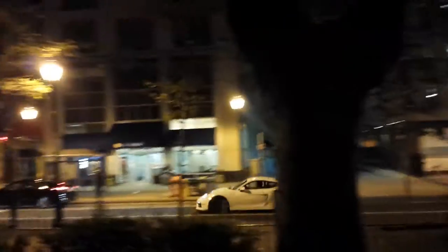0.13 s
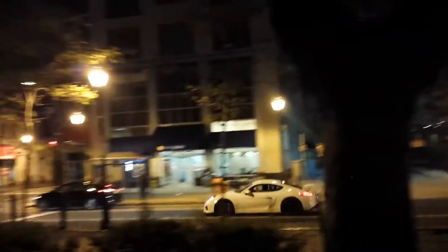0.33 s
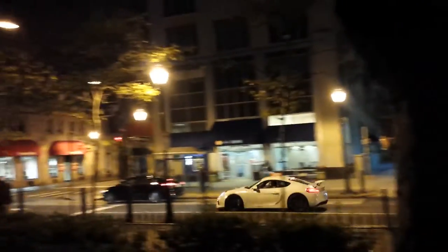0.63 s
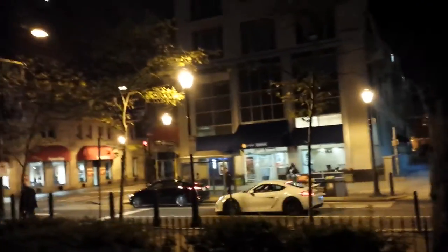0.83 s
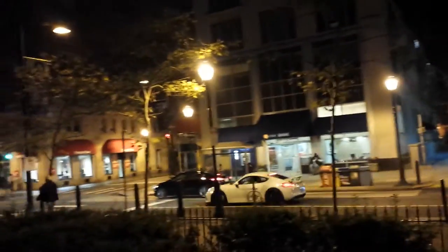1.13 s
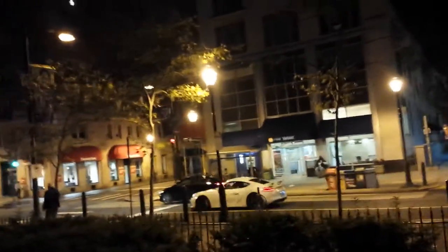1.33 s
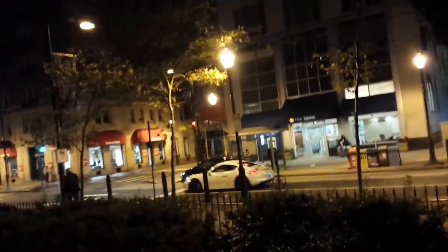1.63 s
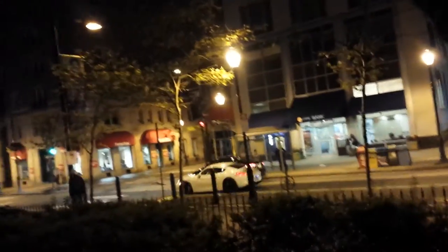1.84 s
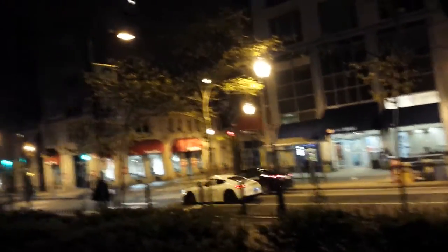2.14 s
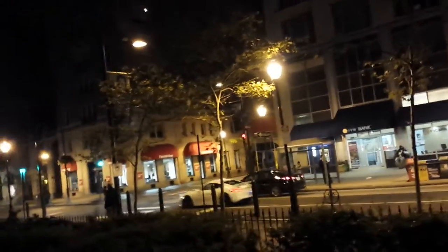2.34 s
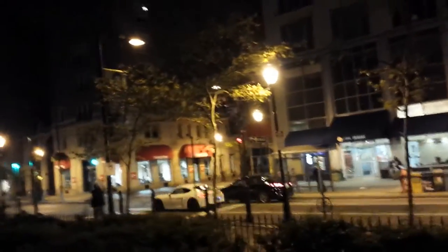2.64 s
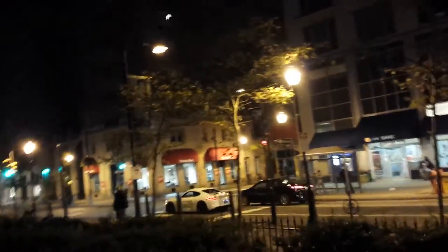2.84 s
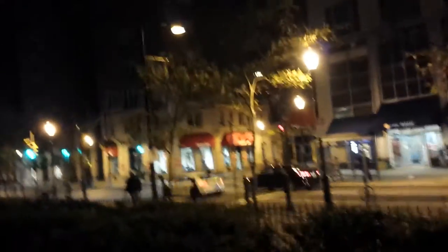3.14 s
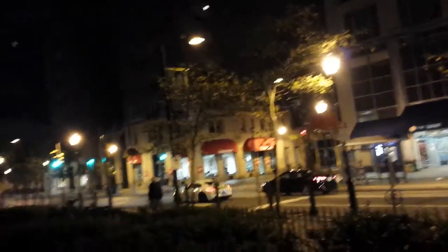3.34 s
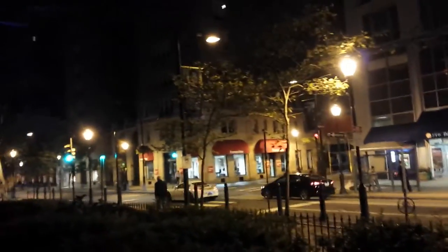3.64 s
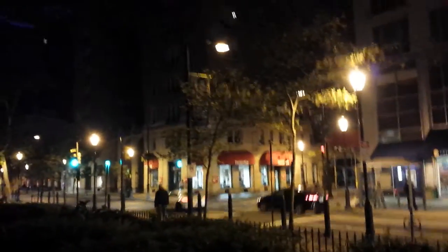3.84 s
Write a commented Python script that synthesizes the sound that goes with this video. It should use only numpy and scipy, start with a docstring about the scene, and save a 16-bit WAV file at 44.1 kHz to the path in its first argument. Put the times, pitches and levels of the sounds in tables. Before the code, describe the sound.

A car engine burbles low, revs in three short bursts, the first loudest and crackling, then climbs in pitch as it pulls away. Heard from the pavement, it echoes lightly off buildings over far traffic.

```python
"""Car pulling away on a night street

Stereo microphones on the pavement. A slow car blips its throttle three times, then accelerates steadily:
two clean exhaust orders climb over firing bursts of roar and rasp, while pulses and backfires ring the
pipe and echo off the house fronts. Tyres rush close by, far traffic rumbles and hisses, and a thin high
chirr comes and goes on the right. The sound fades in."""
import sys
import numpy as np
from scipy import signal
from scipy.fft import rfft, irfft
from scipy.io import wavfile

SR = 44100
rng = np.random.default_rng(int(sys.argv[2]) if len(sys.argv) > 2 else 0)


def bounce(signal):
    """Save signal as a 16-bit WAV file at the path given by the first command-line argument."""
    frames = np.transpose(np.atleast_2d(signal))
    limited = np.clip(frames, -1, 1)
    pcm = np.round(limited * 32767).astype(np.int16)
    wavfile.write(sys.argv[1], SR, pcm)


N = 176400
T = np.arange(N) / SR

# Engine rolling and blipping, then pulling away: t/s, exhaust beat f/Hz, order 1 and order 2 level/dB
ROLL_AND_BLIPS = [(.6, 69.25, -41, -43.5), (.72, 66.92, -37, -36.5), (1.04, 60.1, -36, -35),
                  (1.12, 61.8, -51, -44), (1.17, 77.3, -38, -53), (1.21, 77.65, -33.5, -46),
                  (1.4, 77.4, -33, -38), (1.55, 71.7, -42, -62), (1.7, 60.26, -37, -58),
                  (1.77, 53.02, -35, -34), (1.84, 63.1, -19.5, -21.5), (1.9, 69.7, -34, -27),
                  (1.96, 71.87, -28, -24.5), (2.01, 70.86, -55, -56), (2.05, 65.9, -25.5, -41),
                  (2.12, 59.8, -54, -58), (2.18, 49.98, -31, -41), (2.21, 53.5, -29, -28.5),
                  (2.3, 65.9, -25, -33), (2.36, 75.64, -29.5, -27.5), (2.41, 77.7, -23, -32.5),
                  (2.47, 74.34, -39, -45), (2.55, 55.13, -40, -34), (2.65, 63.9, -27, -32),
                  (2.72, 70.1, -33.5, -44), (2.77, 65.96, -29, -38)]
PULL_AWAY = [(2.799, 57.68, -31, -25.5), (2.88, 60.08, -35, -28.5), (3.02, 62.07, -26, -23.5),
             (3.13, 63.86, -32, -24.5), (3.246, 66.3, -22.5, -21.5), (3.32, 68.06, -24.5, -29.5),
             (3.494, 71.32, -26, -24.5), (3.557, 73.3, -23.5, -30), (3.638, 75.2, -26, -20.5),
             (3.658, 75.65, -31, -21.5), (3.8, 78.8, -28, -16.5), (4.0, 83.95, -26.5, -18.5)]
# Higher exhaust orders: order, level/dB against the louder of orders 1 and 2
HIGHER_ORDERS = [(3, -23), (4, -16), (5, -20)]
# Engine load: t/s, roar level/dB, throat level/dB, rasp level/dB
ENGINE_LOAD = [(1.5, -34, -44, -48.5), (1.75, -38.5, -45, -47), (1.8, -27.5, -40.5, -52),
               (1.815, -36, -33, -37), (1.88, -20.5, -20.5, -30), (1.905, -20, -24.5, -27.5),
               (1.93, -29, -29, -29.5), (1.97, -31.5, -32, -31), (2.02, -43, -35, -37.5),
               (2.17, -37, -43, -64), (2.25, -28.5, -37, -45), (2.35, -27, -28.5, -34),
               (2.42, -26, -33, -36), (2.47, -36, -40, -43.5), (2.6, -29, -40.5, -42),
               (2.65, -21.5, -31, -35), (2.72, -28, -37.5, -35), (2.8, -25.5, -39.5, -47),
               (2.92, -25.5, -39.5, -53), (2.96, -27.5, -34.5, -47), (3.15, -26.5, -30.5, -39),
               (3.33, -27.5, -31, -33), (3.48, -27, -28, -33.5), (3.7, -24, -27, -33),
               (3.78, -25, -30.5, -33), (4.0, -26.5, -27.5, -35)]
# Spectra of the low roar, throaty middle and hissy rasp: f/Hz, level/dB
ROAR_SPECTRUM = [(110, -2), (185, -2), (307, 1), (356, -0.5), (444, 1), (488, -7), (600, -11.5), (780, -44),
                 (1320, -120)]
THROAT_SPECTRUM = [(350, -10), (600, 4), (700, -1.5), (790, 1), (880, 0), (1070, 2.5), (1250, -2.5),
                   (1480, -4.5), (1600, -7), (1720, -11), (1920, -11.5), (3000, -31), (3900, -53),
                   (6600, -120)]
RASP_SPECTRUM = [(1470, -4), (2500, -2.5), (2970, -8), (3920, -4.5), (4320, -8), (6030, -2.5), (10100, -18),
                 (10900, -19), (11600, -48), (15100, -74), (22000, -120)]
# Exhaust pipe modes: f/Hz, level/dB, t60/s
PIPE_MODES = [(180, -4, 0.052), (305, -6.5, 0.028), (420, 2, 0.014), (782, -1.5, 0.02), (996, -17, 0.013),
              (1562, -8.5, 0.021), (3984, -11, 0.013), (5249, -6, 0.01), (5587, -7, 0.02),
              (6300, -23, 0.0087)]
# Hard firings and backfires in the blips: t/s, level/dB, tilt/(dB per octave)
BACKFIRES = [(1.809, -22, -4), (1.822, -22, -3.5), (1.836, -16.5, -2.5), (1.853, -17.5, -2.5),
             (1.867, -12, 0), (1.881, -18, 1.5), (1.894, -10, -1.5), (2.344, -24, -6), (2.37, -28, -2.5),
             (2.639, -37, 6.5)]
# Two pipe resonances under load: t/s, lower one's level/dB, upper one's level/dB
SINGING_LEVELS = [(2.9, -55, -58), (2.955, -35, -39), (2.99, -46, -52), (3.02, -39, -38), (3.1, -44, -52),
                  (3.22, -42, -50), (3.31, -42, -36), (3.4, -35, -40), (3.5, -33, -46), (3.59, -35, -47),
                  (3.66, -44, -43), (3.8, -50, -52)]
# Tyre rush close by: t/s, level/dB; its spectrum: f/Hz, level/dB
TYRE_LEVELS = [(.5, -37.5), (.7, -36), (.85, -37.5), (1.1, -43.5), (1.5, -41)]
TYRE_SPECTRUM = [(290, -34), (500, 1.5), (892, 6.5), (974, 8), (1140, 5.5), (2500, -7), (3250, -38),
                 (5500, -120)]
# Bright puffs: peak t/s, half-width/s, level/dB; their spectrum: f/Hz, level/dB
PUFFS = [(1.22, 0.12, -44), (3.362, 0.021, -23)]
PUFF_SPECTRUM = [(2240, -23), (3800, -10), (5390, -2.5), (6770, -4), (9030, -16), (9920, -18), (10700, -18),
                 (14300, -29)]
# Faint ticks: t/s, level/dB before the high-pass
TICK_HITS = [(1.601, -18), (3.89, -26)]
# Modes of a faint metal clink: f/Hz, level/dB, t60/s
CLINK_MODES = [(1500, -29, .05), (2100, -32, .045), (4600, -31, .07)]
# High chirrs: start t/s, level/dB before panning
CHIRR_ONSETS = [(0.812, -43.5), (2.41, -43.5), (3.05, -46), (3.249, -46.5), (3.69, -47), (3.95, -47)]
# Far traffic: t/s, rumble level/dB, hiss level/dB; their spectra: f/Hz, level/dB
TRAFFIC_LEVELS = [(.6, -33.5, -34.5), (.8, -34, -32.5), (1.2, -31, -32), (1.6, -33, -36),
                  (2.1, -30.5, -33.5), (3, -28, -30.5), (4, -34, -36.5)]
RUMBLE_SPECTRUM = [(15, -43), (25, -21), (53, -3.5), (91, -0.5), (119, 3.5), (157, -3), (200, -2),
                   (260, -22), (440, -120)]
TRAFFIC_HISS_SPECTRUM = [(120, -22), (200, -0.5), (258, -5.5), (300, -3), (361, -9), (427, -10), (541, -12),
                         (826, -10.5), (961, -14.5), (1390, -15.5), (2650, -22.5), (6580, -21),
                         (11300, -38), (14700, -81), (22000, -120)]
# Echoes off the house fronts: left delay/s, right delay/s, level/dB
HOUSE_ECHOES = [(.023, .031, -31), (0.055, 0.064, -12), (.094, .11, -28)]
# Likeness of the two microphones: f/Hz, likeness (0 to 1)
MIC_LIKENESS = [(60, 1), (250, 0.99), (500, 1), (1000, 0.077), (2000, 0.098), (4000, 0.11), (12000, 0.01)]
# Left microphone minus right: f/Hz, level/dB
MIC_BALANCE = [(60, 1), (110, -3), (200, -2.0), (370, -3), (670, -1), (1230, -1.5), (2260, -1.5),
               (4140, -3), (7570, -9.5), (13900, -10.5)]
# Left microphone ahead of right: f/Hz, phase/rad
MIC_LEAD = [(100, -0.086), (690, -0.65), (2240, 0.55), (3500, 1), (5600, -0.94), (6800, -0.79)]
# Three beats make one engine cycle, the first strongest: level/dB
CYCLE_DB = np.array([5.0, -3.0, -1.5])
SLIGHTLY_RIGHT_DB = [[-.9], [.9]]


def engine(wander=.002):
    """Exhaust orders, pipe pulses and bursts of gas noise, all following one slightly wandering beat."""
    beat_hz, first_db, second_db = in_time(ROLL_AND_BLIPS + PULL_AWAY)
    roar_db, throat_db, rasp_db = in_time(ENGINE_LOAD)
    turns = np.cumsum(beat_hz * (1 + wander * drift(5.12))) / SR
    tones = exhaust_orders(turns, first_db, second_db)
    timing, force, firing = np.clip(rng.standard_normal((1000, 3)), -1.8, 1.8).T
    dull_pulses, bright_pulses = exhaust_pulses(turns, timing, force)
    bursts = firing_bursts(turns, firing)
    roar = stereo_noise(ROAR_SPECTRUM, bursts, depth=.32) + amp(-11.5) * dull_pulses
    rasp = stereo_noise(RASP_SPECTRUM, bursts, depth=.33)
    throat = stereo_noise(THROAT_SPECTRUM, bursts, depth=.41) + amp(-8) * bright_pulses
    return tones + amp(roar_db) * roar + amp(throat_db) * throat + amp(rasp_db) * rasp


def exhaust_orders(turns, first_db, second_db, waver_db=.5):
    """Clean tones at whole multiples of the exhaust beat, each wavering in level."""
    louder_db = np.maximum(first_db, second_db)
    orders = [(1, first_db), (2, second_db)] + [(k, louder_db + db) for k, db in HIGHER_ORDERS]
    tones = sum(amp(db + waver_db * drift(16)) * np.cos(2 * np.pi * k * turns) for k, db in orders)
    return -np.sqrt(2) * tones * amp(SLIGHTLY_RIGHT_DB)


def exhaust_pulses(turns, timing, force, jitter_beats=.043, spread_db=6.5):
    """Each beat sends an uneven pulse down the pipe; returns a dull ring and a brighter midrange one."""
    beats = np.arange(1, int(turns[-1]))
    beat_s = np.interp(beats + jitter_beats * timing[beats], turns, T)
    beat_db = CYCLE_DB[beats % len(CYCLE_DB)] + spread_db * force[beats]
    dull = exhaust_pipe(beat_s, beat_db, tilt_db=-4.5)
    bright = butter(exhaust_pipe(beat_s, beat_db, tilt_db=-1), 3, [650, 2200], "band")
    return rms_one(dull), rms_one(bright)


def firing_bursts(turns, force, spread_db=5, sharpness=.57):
    """Envelope of the firings, two to a beat: each jumps to its own strength and decays."""
    firings = 2 * turns
    strength = amp(spread_db * force)[firings.astype(int)]
    return rms_one(strength * np.exp(-sharpness * (firings % 1)))


def exhaust_pipe(times, db, tilt_db):
    """Pressure steps ring the modes of the exhaust, then echo along the street."""
    ring = 0
    at = np.clip(times * SR, 0, N).astype(int)
    for hz, mode_db, t60 in PIPE_MODES:
        steps = np.full(N + 1, 1e-18)
        steps[at] = -amp(db + mode_db + tilt_db * np.log2(hz / 1000))
        r, w = amp(-60 / (t60 * SR)), 2 * np.pi * hz / SR
        ring = ring + signal.lfilter([0, np.sin(w)], [1, -2 * r * np.cos(w), r * r], steps[:N])
    return house_echoes(butter(ring, 6, 9500, "low")) * amp([[-1.1], [1.1]])


def backfires():
    """Hard firings and backfires pop in the pipe during the blips."""
    return exhaust_pipe(*np.transpose(BACKFIRES))


def pipe_singing(modes_hz=(790, 1600), waver_db=2.5):
    """Under load, turbulence sings unsteadily through two narrow pipe resonances."""
    song = 0
    for hz, db in zip(modes_hz, in_time(SINGING_LEVELS)):
        mid, side = resonate(rng.standard_normal((2, N)), hz, width_hz=45)
        song = song + amp(db + waver_db * drift(27)) * rms_one(mid + .51 * side * [[1], [-1]])
    return song * amp(SLIGHTLY_RIGHT_DB)


def tyres(end_s=2):
    """Tyres roll past close to the microphones with a midrange rush."""
    return amp(in_time(TYRE_LEVELS)[0]) * (T < end_s) * stereo_noise(TYRE_SPECTRUM)


def puffs():
    """Brief bright hisses swell and die near the middle of the stereo image."""
    swell = sum(amp(db) * np.exp(-((T - s) / half_width) ** 2) for s, half_width, db in PUFFS)
    return swell * stereo_noise(PUFF_SPECTRUM, balance_share=.1)


def ticks():
    """Single clicks with only their treble heard."""
    clicks = np.zeros(N)
    for s, db in TICK_HITS:
        clicks[int(s * SR)] = amp(db)
    return butter(clicks, 4, 9000, "high")


def clink(start_s=2.543, rise_s=.006):
    """Metal struck once, softly, rings in three short modes."""
    age = np.maximum(T - start_s, 0)
    ring = sum(amp(db - 60 * age / t60) * np.sin(2 * np.pi * hz * age) for hz, db, t60 in CLINK_MODES)
    return np.tanh(age / rise_s) * ring


def chirrs(hz=10600, width_hz=260, rise_s=.012, fall_s=.095):
    """A thin band of noise off to the right, quick to rise and slower to fade."""
    band = rng.standard_normal(N)
    for _ in range(2):
        band = resonate(band, hz, width_hz)
    ages = [(np.maximum(T - s, 0), db) for s, db in CHIRR_ONSETS]
    envelope = sum(amp(db) * np.tanh(age / rise_s) * np.exp(-age / fall_s) for age, db in ages)
    return envelope * rms_one(band) * amp([[-13], [4]])


def far_engine(hz=137.6, peak_s=1.047, half_width_s=.12):
    """A distant engine's note swells once."""
    swell = amp(-27.5) * np.exp(-((T - peak_s) / half_width_s) ** 4)
    return swell * np.sin(2 * np.pi * hz * T) * amp(SLIGHTLY_RIGHT_DB)


def far_traffic(waver_db=1.7):
    """Distant traffic fills the street with rumble and a gently unsteady hiss."""
    rumble_db, hiss_db = in_time(TRAFFIC_LEVELS)
    rumble = amp(rumble_db) * stereo_noise(RUMBLE_SPECTRUM)
    return rumble + amp(hiss_db + waver_db * drift(1.8)) * stereo_noise(TRAFFIC_HISS_SPECTRUM)


def house_echoes(direct):
    """Adds dull echoes off the house fronts, reaching each microphone at a different time."""
    dull = signal.lfilter([.3], [1, -.7], direct)
    pair = np.array([direct, direct])
    for *delays, db in HOUSE_ECHOES:
        for mic, delay in enumerate(delays):
            lag = int(delay * SR)
            pair[mic, lag:] += amp(db) * dull[:N - lag]
    return pair


def stereo_noise(spectrum, envelope=1, depth=0, balance_share=1):
    """Noise at the microphone pair, pulsed to the given depth, then shaped by a spectrum; rms 1."""
    hz = np.maximum(np.fft.rfftfreq(N, 1 / SR), 1)
    low, high = spectrum[0][0], spectrum[-1][0]
    gain = amp(at_hz(spectrum, hz)) / (1 + (low / hz) ** 6) / (1 + (hz / high) ** 60)   # steep ends
    mid, side = rfft((1 - depth + depth * envelope) * rng.standard_normal((2, N)))
    alike = np.clip(at_hz(MIC_LIKENESS, hz), 0, 1)
    mics = np.array([[.5], [-.5]])
    pair = np.sqrt(1 + alike) * mid + np.sqrt(1 - alike) * side * 2 * mics
    balance = amp(balance_share * at_hz(MIC_BALANCE, hz) * mics)
    lead = np.exp(1j * at_hz(MIC_LEAD, hz) * mics)
    return rms_one(irfft(gain * balance * lead * pair, N))


def drift(rate_hz):
    """Slow random wander with a spread of 1."""
    step = 40   # samples per random draw
    r = np.exp(-2 * np.pi * rate_hz * step / SR)
    slow = signal.lfilter([1], [1, -2 * r, r * r], rng.standard_normal(N // step + 2002))[2000:]
    return np.interp(np.arange(N) / step, np.arange(len(slow)), rms_one(slow))


def resonate(x, hz, width_hz):
    r = np.exp(-np.pi * width_hz / SR)
    return signal.lfilter([1, 0, -1], [1, -2 * r * np.cos(2 * np.pi * hz / SR), r * r], x)


def butter(x, order, hz, kind):
    return signal.sosfilt(signal.butter(order, hz, kind, fs=SR, output="sos"), x)


def amp(db):
    return 10 ** (np.asarray(db) / 20)


def rms_one(x):
    return x / np.sqrt(np.mean(x ** 2) + 1e-20)


def in_time(rows):
    times, *columns = np.transpose(rows)
    return [np.interp(T, times, column) for column in columns]


def at_hz(rows, hz):
    row_hz, values = np.transpose(rows)
    return np.interp(np.log(hz), np.log(row_hz), values)


def scene():
    """The car and the street around it, heard from the pavement."""
    exhaust = engine() + backfires()
    street = far_traffic() + far_engine() + tyres()
    small_sounds = puffs() + chirrs() + ticks() + clink()
    return exhaust + pipe_singing() + street + small_sounds


def record(dry, ceiling=.9, fade_start_s=.41, fade_s=.28, top_hz=14460):
    """The microphones drop the deepest bass and round off peaks; silence, a fade in; the top is cut."""
    heard = butter(dry, 2, 35.8, "high")
    rounded = ceiling * np.tanh(heard / ceiling)
    fade = np.clip((T - fade_start_s) / fade_s, 0, 1)
    return signal.sosfilt(signal.ellip(10, .5, 70, top_hz, fs=SR, output="sos"), rounded * fade)


dry = scene()
out = record(dry)
bounce(out)
```